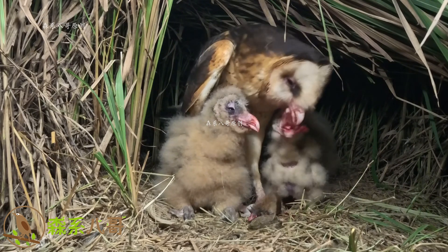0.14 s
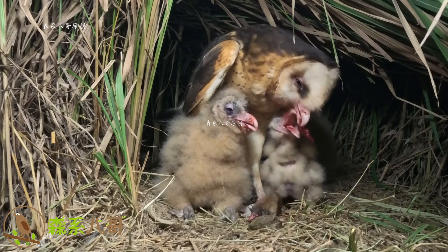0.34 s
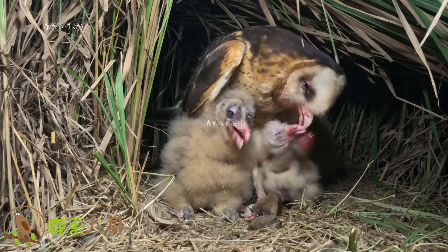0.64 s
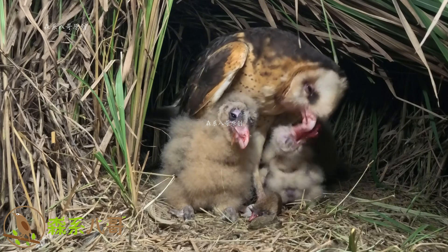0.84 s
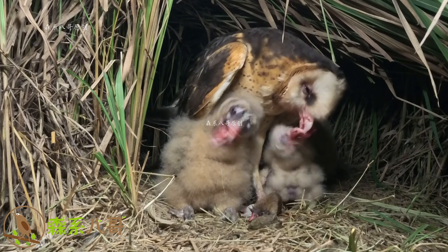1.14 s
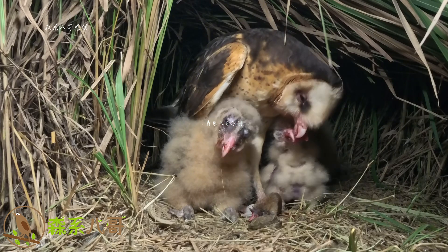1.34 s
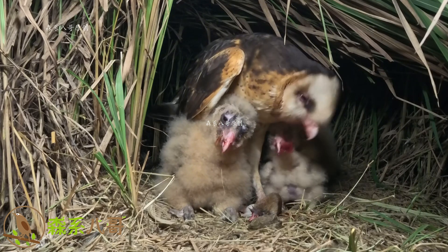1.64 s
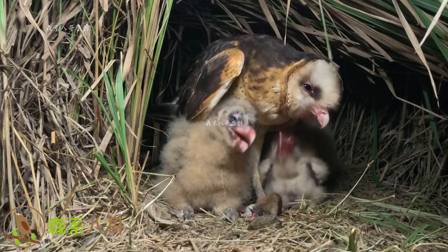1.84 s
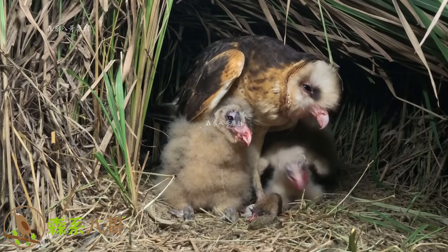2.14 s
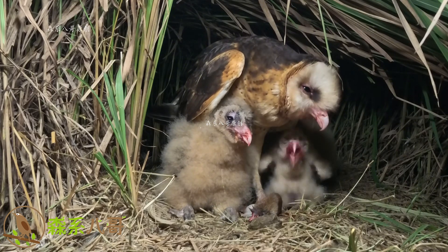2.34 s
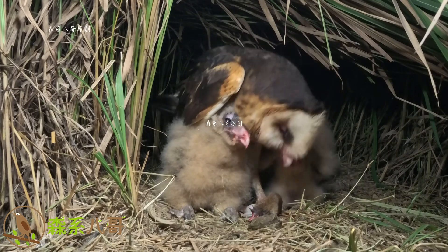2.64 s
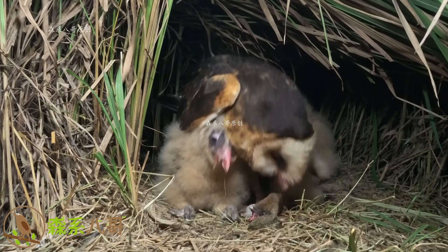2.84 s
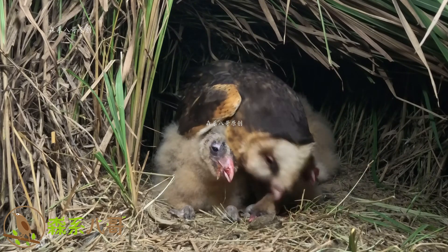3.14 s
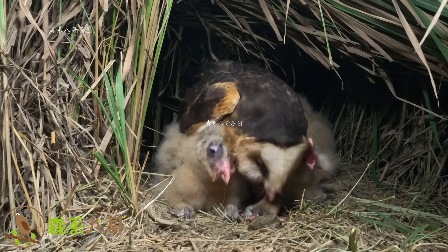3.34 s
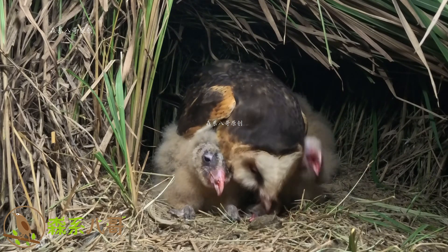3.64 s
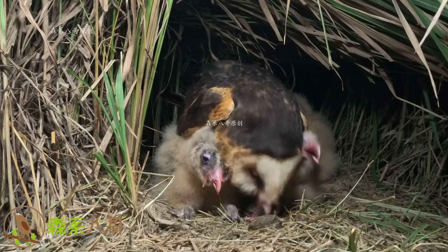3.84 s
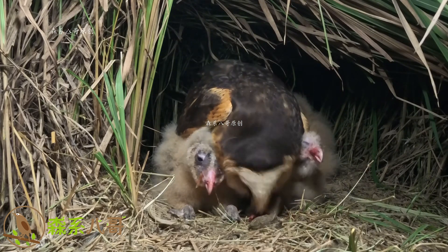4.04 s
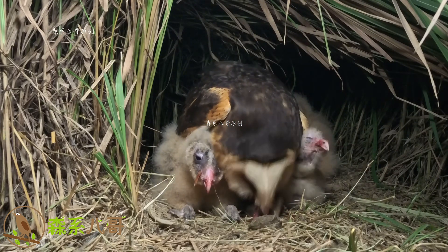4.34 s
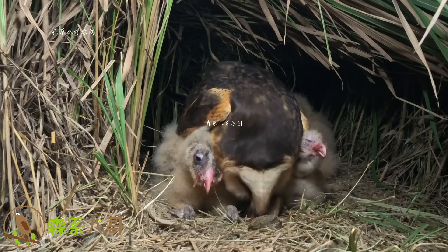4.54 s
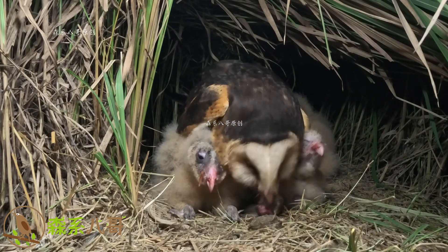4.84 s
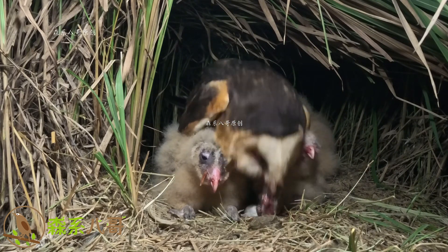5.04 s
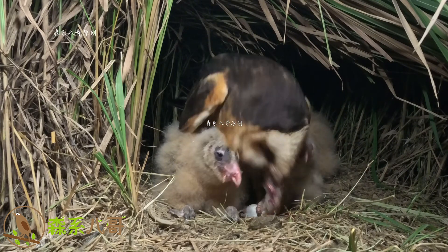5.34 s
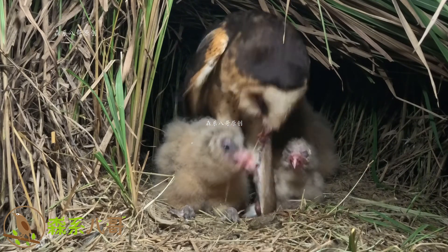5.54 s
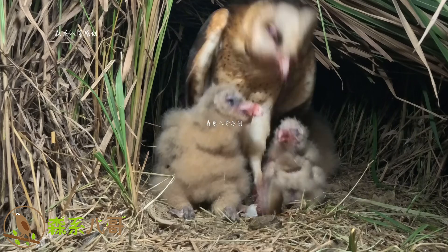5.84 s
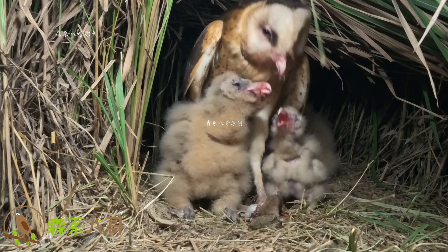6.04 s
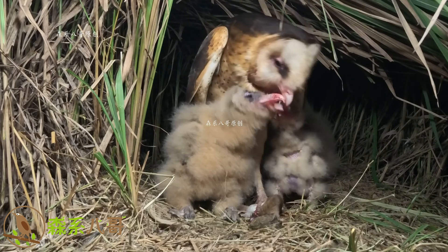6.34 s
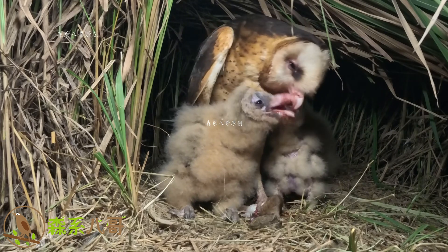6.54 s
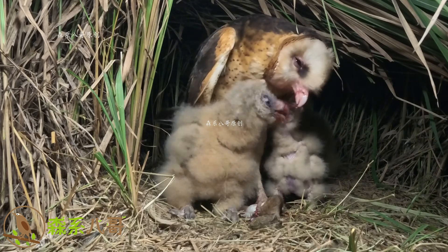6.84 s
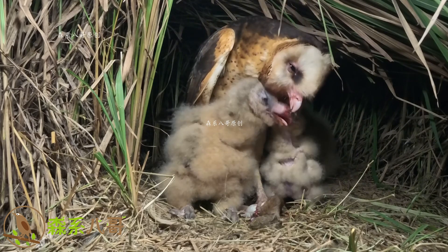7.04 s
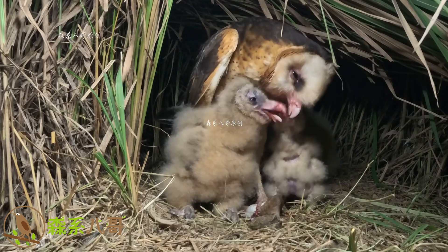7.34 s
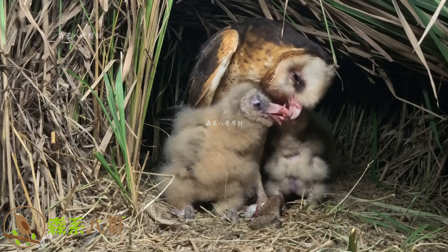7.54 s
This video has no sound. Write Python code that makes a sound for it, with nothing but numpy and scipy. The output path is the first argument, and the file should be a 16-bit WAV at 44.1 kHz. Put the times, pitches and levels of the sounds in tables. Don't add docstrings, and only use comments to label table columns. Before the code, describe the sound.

Young owl chicks give short, harsh hissing begging rasps at close range in a grassy nest, over steadily chirping night crickets.

```python
import sys
import numpy as np
from scipy import signal
from scipy.fft import rfft, irfft, next_fast_len
from scipy.io import wavfile
from scipy.ndimage import uniform_filter1d

SR = 44100
rng = np.random.default_rng(int(sys.argv[2]) if len(sys.argv) > 2 else 0)


def gain_from_db(level_db):
    decades = np.asarray(level_db, float) / 20
    return 10 ** decades


def store_wav(level_fs):
    pcm = np.round(np.clip(np.atleast_2d(level_fs), -1, 1) * 32767)
    wavfile.write(sys.argv[1], SR, pcm.T.astype(np.int16))


N = 338247

# centre in Hz, width in Hz, level in dB.
MOUTH = [(5700, 1080, 1.5), (7400, 1100, 8), (8530, 480, -7)]
BEAK = [(10000, 1440, 6), (12500, 1400, 2), (14300, 1100, -2)]


def evened(x):
    return x / np.sqrt(np.mean(x ** 2) + 1e-20)


def add(mix, s, sound):
    at = round(s * SR)
    sound = sound[max(-at, 0):]
    part = mix[max(at, 0):][:len(sound)]
    part += sound[:len(part)]


def resonate(x, modes):
    size = next_fast_len(len(x))
    f = np.fft.rfftfreq(size, 1 / SR)
    gain = sum(gain_from_db(db) * np.exp(-((f - hz) / width) ** 2) for hz, width, db in modes)
    return evened(irfft(rfft(x, size) * gain, size)[:len(x)])


def drift(hz, size=N):
    knots = rng.standard_normal(N // 32)
    return evened(np.interp(np.arange(size) * hz / SR, np.arange(len(knots)), knots))


def patchwork(shape):
    rough = rng.standard_normal(shape)
    return evened(uniform_filter1d(uniform_filter1d(rough, size=10, axis=0), size=12, axis=1))


def highpass(x, hz):
    return signal.sosfilt(signal.butter(8, hz, "high", fs=SR, output="sos"), x)


def grass(x, t60):
    taps = np.zeros(SR // 2)
    starts = np.arange(300, len(taps) - 20, 20)
    taps[starts + rng.integers(0, 20, len(starts))] = 1
    taps *= rng.choice([-1., 1.], len(taps)) * gain_from_db(-60 * np.arange(len(taps)) / SR / t60)
    return signal.fftconvolve(x, taps / np.linalg.norm(taps))[:N]


def bed(shape, db, patchy_db, flicker_db):
    frames, hz = N // 256 + 5, np.fft.rfftfreq(1024, 1 / SR)
    a, b = rng.standard_normal((2, 513, frames))
    f, level = np.transpose(shape)
    level_db = np.interp(np.log(hz + 1), np.log(f), level, left=-99, right=-99)[:, None]
    uneven_db = patchy_db * patchwork((513, frames)) + flicker_db * rng.standard_normal(frames)
    z = (a + 1j * b) * gain_from_db(level_db + uneven_db)
    return gain_from_db(db) * evened(signal.istft(z, nperseg=1024, noverlap=768)[1][:N])


def wind():
    # frequency in Hz, density in dB per Hz.
    spectrum = [(12, -29), (24, 7), (58, 0), (84, -18), (122, -8), (330, -39), (439, -33.5), (601, -41),
                (791, -40), (2200, -58.5), (2860, -112), (4840, -120)]
    return bed(spectrum, db=-51, patchy_db=1.28, flicker_db=.95)


def far_insects():
    # frequency in Hz, density in dB per Hz.
    spectrum = [(1710, -90), (2900, -29), (3370, -34), (4160, -28), (4470, -17), (5030, -8), (5250, -24),
                (6820, -56), (11600, -120)]
    return bed(spectrum, db=-78, patchy_db=8, flicker_db=.5)


def katydids():
    # frequency in Hz, density in dB per Hz.
    spectrum = [(3820, -50), (6500, -44), (7040, -21), (7610, -7.5), (8210, -3), (8680, 4), (9160, 0.5),
                (9580, -44), (10000, 3.5), (10600, 5.5), (11900, 3), (12800, 1), (13400, -22),
                (14500, -1.5), (15600, -16)]
    return bed(spectrum, db=-58, patchy_db=2.4, flicker_db=3.9)


def chorus():
    out = np.zeros(N)
    for hz, width, db in [(4690, 59, -82), (5060, 45, -80), (5470, 90, -82),
                          (5720, 97, -61), (5900, 70, -61.5), (6050, 94, -61)]:
        out += gain_from_db(db + 3.1 * drift(7)) * resonate(rng.standard_normal(N), [(hz, width, 0)])
    trill = resonate(rng.standard_normal(N), [(2557, 110, 5.5), (2640, 480, -29)])
    return out + gain_from_db(-62 + 2.1 * drift(32)) * trill


def wing_strokes():
    # start in seconds, pace, pitch in Hz, level in dB,
    # haste of the second stroke in seconds.
    high_phrases = [
        (.687, .995, 6120, -38, .012),
        (2.058, 1.022, 6125, -38.5, 0),
        (3.991, .998, 6140, -40, 0),
        (6.096, .99, 6135, -39.5, 0),
    ]
    phrase_s = [0, .288, .496, .572, .648]
    # first stroke in seconds,
    # last stroke in seconds, pitch in Hz, level in dB, late drop in Hz.
    near_chirps = [(0, 0, 5900, -41, 20), (1.612, 1.612, 5890, -34.5, 200), (1.933, 2.006, 5945, -31, 150),
                   (2.082, 2.082, 5960, -32, 120), (4.595, 4.595, 5920, -34, 140),
                   (4.906, 4.906, 5930, -37.5, 300), (4.976, 5.047, 5950, -31.5, 120),
                   (5.265, 5.415, 5885, -29.5, 40), (6.362, 6.362, 5850, -37, 260),
                   (6.692, 6.844, 5895, -29, 40), (7.618, 7.618, 5860, -38, 30)]
    low_chirps = [(-.012, -.012, 5680, -47, 250), (.037, .037, 5720, -46, 250),
                  (.538, .538, 5770, -44, 350), (2.074, 2.074, 5740, -41, -150),
                  (2.626, 2.626, 5780, -46, 200), (2.664, 2.664, 5850, -41, 300),
                  (.278, .494, 5825, -38.5, 30), (.61, .61, 5870, -51, 100), (.798, .941, 5840, -43.5, 280),
                  (1.1, 1.1, 5770, -50, 200), (1.247, 1.247, 5800, -45.5, 200),
                  (1.429, 1.429, 5840, -49, 50), (1.46, 1.46, 5800, -46, 250),
                  (1.716, 1.716, 5800, -38.5, 30), (2.22, 2.22, 5750, -48, 200),
                  (2.506, 2.58, 5850, -40.5, 250), (2.953, 3.09, 5830, -44.5, 200),
                  (3.317, 3.317, 5720, -48, 100), (3.581, 3.721, 5850, -43.5, 330),
                  (3.791, 3.791, 5770, -48, 300), (4.123, 4.27, 5790, -42.5, 170),
                  (4.332, 4.462, 5820, -44, 175), (4.834, 4.834, 5820, -41.5, 90),
                  (5.931, 5.931, 5765, -49.5, 105), (6.064, 6.064, 5770, -41.5, 220),
                  (6.213, 6.291, 5840, -43.5, 100), (6.436, 6.436, 5750, -42, 100),
                  (6.452, 6.6, 5860, -46.5, 280), (7.3, 7.365, 5740, -46, 100),
                  (7.44, 7.52, 5850, -45.5, 100)]
    middle_chirps = [(.05, .05, 6020, -45.5, 50), (.095, .17, 6130, -54, 10), (.6, .6, 5950, -50, 50),
                     (2.56, 2.56, 6020, -44, 30), (4.93, 4.93, 5760, -42, 200), (5.15, 5.21, 6190, -56, 10),
                     (.875, .875, 5960, -45, 100), (1.31, 1.31, 5920, -50, 30),
                     (1.549, 1.549, 5920, -42, 30), (1.666, 1.791, 5980, -44.5, 30),
                     (2.207, 2.357, 5915, -45.5, 100), (2.417, 2.482, 6050, -47, 50),
                     (2.892, 2.892, 5980, -49.5, 90), (2.98, 3.118, 5980, -46, 130),
                     (3.47, 3.47, 6010, -44.5, 60), (3.548, 3.625, 6050, -45.5, 110),
                     (3.02, 3.16, 6110, -54, 60), (5.51, 5.65, 6120, -54, 20), (6.11, 6.11, 6050, -43, 30),
                     (6.24, 6.31, 6020, -49, 60), (6.42, 6.42, 5990, -47, 60),
                     (4.711, 4.711, 5870, -47, 30), (5.179, 5.179, 5980, -53.5, 95),
                     (5.48, 5.61, 6000, -48, 105), (5.67, 5.725, 5905, -48, 100),
                     (5.976, 6.03, 6020, -47, 100), (6.158, 6.158, 6050, -45, 200),
                     (7.049, 7.196, 6040, -45.5, 125), (7.323, 7.323, 6040, -43.5, 60)]
    far_chirps = [(.091, .17, 5410, -63, 30), (2.78, 2.92, 5350, -71, 30), (3.071, 3.071, 5400, -57, 30),
                  (4.4, 4.54, 5330, -76, 30), (4.68, 4.751, 5400, -62, 30)]
    # stroke length in seconds, attack share, release share, wobble in dB, edge scrape in dB.
    high_wing = (.056, .03, .14, 2.3, -33)
    near_wing = (.053, .05, .24, .9, -25)
    hidden_wing = (.056, .06, .2, 2.6, -45)
    gap_s, swell_db = .072, .6
    strokes = []
    for s, pace, hz, db, haste in high_phrases:
        for at in phrase_s:
            strokes.append((s + pace * at - haste * (at == phrase_s[1]), hz, db, 110, high_wing))
    for rows, wing in [(near_chirps, near_wing), (low_chirps + middle_chirps + far_chirps, hidden_wing)]:
        for first, last, hz, db, drop_hz in rows:
            times = np.linspace(first, last, round((last - first) / gap_s) + 1)
            strokes += [(s, hz, db + swell_db * (s - times.mean()) / gap_s, drop_hz, wing) for s in times]
    return strokes


def crickets():
    scattered, scrapes, song = np.zeros((3, N))
    wobble = drift(70)
    for s, hz, db, drop_hz, (length, attack, release, wobble_db, scrape_db) in wing_strokes():
        u = np.linspace(0, 1, round(length * SR))
        rise_hz = np.clip(.9 * (hz - 5960), 0, 210)
        sag_hz = 1.4 * (drop_hz + 50) * u ** 5.1
        pitch_hz = hz + rise_hz * (np.clip((u - .12) / .3, 0, 1) - .52) - sag_hz
        turn = 2 * np.pi * (np.cumsum(pitch_hz) / SR + rng.random())
        dip_db = -.005 * sag_hz - .075 * rise_hz * np.exp(-((u - .6) / .13) ** 2)
        shape = np.minimum(u / attack, 1) * np.clip((1 - u) / release, 0, 1) * gain_from_db(dip_db)
        stroke = np.sqrt(2) * shape * (np.sin(turn) + .028 * np.sin(2 * turn))
        wobbling = np.resize(wobble[max(round(s * SR), 0):], len(u))
        add(song, s, gain_from_db(db + wobble_db * wobbling) * stroke)
        add(scattered, s, gain_from_db(.5 * db - 26) * stroke)
        catch, let_go = np.exp(-((u - .05) / .035) ** 2), np.exp(-((u - .88) / .07) ** 2)
        add(scrapes, s, gain_from_db(db + scrape_db) * (catch + .3 * np.exp(-u / .4) + .5 * let_go))
    scrapes *= resonate(rng.standard_normal(N), [(6800, 420, 0), (5050, 200, -4)])
    return highpass(song + grass(scattered, .42), 5100) + scrapes


def ticks():
    # time in seconds,
    # peak in dB, centre in Hz.
    dry_ticks = [(.0303, -42, 10400), (.2384, -27, 6200), (.243, -30, 4200), (.8011, -40, 8500),
                 (1.2344, -50, 11700), (2.095, -42, 14000), (2.166, -35.5, 10400), (2.204, -44, 9500),
                 (2.4009, -40, 10400), (2.44, -46, 7000), (2.6666, -38.5, 10400), (2.802, -40, 10500),
                 (3.7329, -42, 10200), (4.5415, -36, 10400), (4.5745, -39, 10400), (5.6151, -36, 11000),
                 (6.0057, -42, 11900), (7.1362, -42, 10500), (.4997, -41, 9500), (.5047, -40, 9500),
                 (1.1987, -45, 9500), (5.069, -42, 9500), (7.5842, -35, 6500), (7.6011, -34, 6600),
                 (7.64, -41, 10400)]
    gulps = [(5.582, -42, 2300), (5.62, -49, 2800), (5.626, -51, 2200), (5.633, -51, 3000),
             (5.639, -53, 2400), (5.645, -54, 3000), (5.588, -42, 10500), (5.535, -45, 8500)]
    out, t = np.zeros(N), np.arange(600) / SR
    for s, db, hz in dry_ticks + gulps:
        snap = resonate(rng.standard_normal(600), [(hz, max(.17 * hz, 1200), 0)])
        add(out, s, gain_from_db(db - 6.5) * snap * np.exp(-t / .0035) * np.minimum(t / .001, 1))
    return out


def opening(u, widest, climb_db, climb_power, fall_db, fall_power):
    climb = climb_db * np.clip(1 - u / widest, 0, 1) ** climb_power
    fall = fall_db * np.clip((u - widest) / (1 - widest), 0, 1) ** fall_power
    return -climb - fall


def folds(effort_db, per_s, spread_db, air, stall):
    size = len(effort_db)
    rate = per_s * gain_from_db(.6 * np.clip(effort_db + 4, -20, 0))
    turns = np.cumsum(rate * gain_from_db(4 * drift(600, size))) / SR
    strength = gain_from_db(spread_db * np.clip(rng.standard_normal(size), -3, .8))
    slaps = (np.diff(np.floor(turns), prepend=0) > 0) * strength
    slaps[3:] -= .5 * slaps[:-3].copy()
    flow = np.clip(1.6 * (drift(560, size) + stall), .22, 1)
    return flow * (evened(slaps / np.sqrt(rate)) + air * rng.standard_normal(size))


def slide(x, modes, scale):
    f, t, z = signal.stft(x, SR, nperseg=512, noverlap=384)
    f = f[:, None]
    at = np.interp(t * SR, np.arange(len(x)), np.clip(scale, .4, 2))
    gain = sum(gain_from_db(db) * np.exp(-((f / at - hz) / width) ** 2) for hz, width, db in modes)
    gain *= gain_from_db(2.5 * patchwork(z.shape))
    gain *= 1 - np.exp(-(f / 250) ** 4)
    return evened(signal.istft(z * gain, SR, nperseg=512, noverlap=384)[1][:len(x)])


def rasp(row, manner, beak_db, slides, chest, throat, stall):
    s, length, mouth_db, chest_db, throat_db = row
    u = np.arange(0, length, 1 / SR) / length
    opened_db = np.array([opening(u, *part) for part in manner])
    drive = folds(opened_db[2], per_s=800, spread_db=4.6, air=.58, stall=stall)
    early, late = (1 - u) ** 3.1, u ** 5.1
    parts = np.array([slide(drive, MOUTH, 1 + .04 * late),
                      slide(drive, chest, 1 + slides[0] * early + slides[1] * late),
                      slide(drive, throat, 1 + slides[2] * early + slides[3] * late),
                      slide(drive, BEAK, 1 - .04 * late)])
    level_db = opened_db + np.c_[[mouth_db, chest_db, throat_db, chest_db + beak_db]]
    return s, signal.windows.tukey(len(u), .09) * (gain_from_db(level_db) * parts).sum(0)


def rasps():
    # centre in Hz, width in Hz, level in dB.
    chest = [(489, 199, 2), (950, 370, -8), (1674, 396, -3)]
    small_chest = [(656, 310, 4.5), (1200, 270, -11), (1900, 920, -1)]
    deep_chest = [(430, 230, 3), (820, 260, -10), (1650, 320, -3)]
    throat = [(2680, 530, -1.5), (3800, 1100, -2.5), (4980, 440, -5.5)]
    small_throat = [(2380, 470, 0.078), (3700, 990, 3.1), (4800, 940, -3)]
    pinched_throat = [(3370, 300, -1.5), (3300, 1200, -15)]
    turned_throat = [(3300, 500, -11), (4600, 600, 0)]
    # start in seconds, length in seconds, mouth, chest and throat levels in dB.
    eased_rasps = [(1.455, .261, -35, -41, -41), (3.127, .238, -36.5, -39.5, -45.5)]
    sudden_rasps = [(3.962, .263, -38, -40, -43.5), (4.785, .271, -38.5, -40.5, -48)]
    small_rasps = [(6.172, .263, -41.5, -43.5, -42.5), (7.225, .262, -46.5, -45, -46)]
    pinched_rasps = [(2.24, .114, -62, -52, -42)]
    swelling_rasps = [(.94, .245, -34.5, -46, -41)]
    weak_rasps = [(5.255, .24, -47.5, -47.5, -48)]
    turned_rasps = [(6.775, .235, -37.5, -45.5, -50)]
    deep_rasps = [(5.712, .246, -42, -42.5, -48.5)]
    late_rasps = [(.215, .275, -34.5, -39.5, -38)]
    # widest as share of length,
    # climb in dB, climb power, fall in dB, fall power.
    eased = [(.55, 42, 6.1, 35, 4.6), (.8, 37, 4.8, 23, 3.4), (.55, 28, 4.5, 35, 4.4),
             (.55, 30, 6.1, 22, 4.1)]
    sudden = [(.55, 17, 2.5, 29, 4.5), (.75, 11, 2.1, 26, 5.1), (.55, 21, 2.2, 27, 3.6),
              (.55, 15, 2.5, 26, 4.5)]
    small = [(.3, 20, 2.6, 32, 2.4), (.8, 38, 2.1, 22, 3.5), (.45, 19, 9.1, 24, 3.5), (.6, 24, 14, 30, 4.1)]
    shut = [(.4, 16, 3.1, 14, 6.1), (.62, 60, 1.6, 24, 2.4), (.55, 33, 4.1, 30, 4.1),
            (.6, 14, 2.1, 16, 4.1)]
    swelling = [(.8, 30, 2.4, 31, 2.6), (.65, 35, 1.9, 17, 6.1), (.55, 28, 4.9, 30, 3.6),
                (.35, 19, 12, 30, 3.6)]
    weak = [(.75, 16, 2.4, 27, 2.8), (.85, 30, 2.6, 22, 3.1), (.3, 34, 4.1, 22, 2.4),
            (.62, 30, 1.7, 25, 3.1)]
    turned = [(.3, 38, 1.8, 24, 8.1), (.85, 36, 4.6, 20, 2.5), (.33, 38, 1.8, 14, 2.6),
              (.8, 28, 1.9, 28, 1.8)]
    deep = [(.6, 22, 2.5, 29, 4.5), (.7, 9, 2.1, 22, 5.1), (.55, 24, 2.2, 27, 3.6), (.55, 15, 2.5, 26, 4.5)]
    late = [(.78, 40, 5.6, 30, 3.6), (.8, 52, 4.8, 20, 3.4), (.8, 20, 2.6, 22, 3.1), (.7, 36, 7.1, 22, 3.6)]
    beak_over_chest_db = [-2.5, -.1, 4.1, -7.1, 5.3, 4.4, 2.1, 1.5, -2.5]
    slides_by_manner = [(.2, -.15, -.1, -.1), (.05, -.15, .05, -.1), (.3, -.1, .1, -.1),
                        (.3, -.1, .08, -.1), (.3, -.1, .1, -.1), (.3, -.1, -.1, -.1), (.1, -.05, -.2, .3),
                        (-.05, -.12, .1, -.05), (.2, -.1, -.1, -.15)]
    big_flow, small_flow = 1.55, 1.25
    big_chick, small_chick = (chest, throat, big_flow), (small_chest, small_throat, small_flow)
    voices = [(eased_rasps, eased, big_chick), (sudden_rasps, sudden, big_chick),
              (small_rasps, small, small_chick),
              (pinched_rasps, shut, (small_chest, pinched_throat, small_flow)),
              (swelling_rasps, swelling, small_chick), (weak_rasps, weak, small_chick),
              (turned_rasps, turned, (chest, turned_throat, big_flow)),
              (deep_rasps, deep, (deep_chest, throat, big_flow)), (late_rasps, late, big_chick)]
    out = np.zeros(N)
    for (rows, manner, chick), beak_db, slides in zip(voices, beak_over_chest_db, slides_by_manner):
        for row in rows:
            add(out, *rasp(row, manner, beak_db, slides, *chick))
    return out


def catch(voice):
    # start in seconds, length in seconds.
    catches = [(.25, .006), (5.372, .006), (6.197, .006), (6.209, .006), (6.273, .006), (6.835, .005)]
    out = voice.copy()
    for s, length in catches:
        size = round(length * SR)
        out[round(s * SR):][:size] *= 1 - .9 * signal.windows.tukey(size, .5)
    return out


def fry(voice):
    # first in seconds, last in seconds, gap in seconds, peak in dB, throat in Hz.
    runs = [(.4595, .4595, .005, -24, 2500), (.467, .477, .005, -25, 2200),
            (.9965, 1.001, .0045, -30, 2300), (1.1505, 1.167, .0041, -26, 2250),
            (7.449, 7.461, .004, -34, 2300), (1.685, 1.697, .004, -32, 1700),
            (5.926, 5.938, .004, -35, 1600), (4.188, 4.2, .004, -33, 1750), (3.333, 3.345, .004, -33, 1550),
            (6.1795, 6.1835, .004, -34, 3300), (5.027, 5.039, .004, -33, 1700),
            (6.4, 6.408, .004, -29, 2200), (7.263, 7.263, .005, -32, 4000), (5.452, 5.472, .004, -36, 2300)]
    out, click = voice.copy(), np.zeros(400)
    click[200], click[203] = 1, -.6
    for first, last, gap, db, hz in runs:
        span = round((last - first + 1.5 * gap) * SR)
        out[round((first - .5 * gap) * SR):][:span] *= 1 - .62 * signal.windows.tukey(span, .3)
        head = [(f, width, level - 8) for f, width, level in MOUTH + BEAK]
        slap = resonate(click, [(hz, 380, 15), (550, 300, 6), (4300, 900, -4)] + head)
        for k, s in enumerate(np.arange(first, last + .5 * gap, gap)):
            add(out, s - 200 / SR, gain_from_db(db - 1.5 * k) * slap / abs(slap).max())
    return out


def squeak(voice):
    # start in seconds, first pitch in Hz, last pitch in Hz, level in dB.
    squeaks = [(0.257, 3800, 4040, -43.5), (.4795, 1850, 1200, -45), (.942, 4050, 3950, -61),
               (.968, 3950, 3500, -50), (7.236, 3000, 3600, -54), (6.206, 4200, 3600, -46),
               (3.126, 1950, 2200, -57), (1.166, 2150, 1160, -45), (1.698, 1470, 1010, -47),
               (3.345, 1400, 950, -45.5), (4.2, 1610, 1025, -43.5), (5.036, 1700, 1000, -46),
               (5.259, 1900, 2630, -48), (5.477, 1810, 1200, -46.5), (5.938, 1500, 950, -45),
               (6.411, 1860, 1200, -47), (7.266, 3920, 3700, -49), (7.463, 2190, 1370, -42.5)]
    out = voice.copy()
    u = np.linspace(0, 1, round(.017 * SR))
    for s, from_hz, to_hz, db in squeaks:
        glide_hz = from_hz + (to_hz - from_hz) * u ** .8
        turn = 2 * np.pi * np.cumsum(glide_hz * (1 + .012 * drift(700, len(u)))) / SR
        second = .5 if from_hz > 3700 else .2
        tone = np.sin(turn) + second * np.sin(2 * turn) + .08 * np.sin(3 * turn)
        if 3900 < from_hz < 3940:
            out[round(s * SR):][:len(u)] *= 1 - .85 * signal.windows.tukey(len(u), .4)
        fade_db = -12 * u * (from_hz - to_hz > 300)
        add(out, s, gain_from_db(db + 4 + fade_db) * np.sqrt(2) * tone * signal.windows.tukey(len(u), .6))
    return out


def chicks():
    return squeak(fry(catch(rasps())))


def parting_treble(voice):
    # start in seconds, length in seconds, level in dB.
    splits = [(0.938, 0.037, -7), (1.46, 0.038, -20), (3.182, 0.097, -5), (4.023, 0.24, -24),
              (4.814, 0.11, -6), (5.727, 0.22, -4.5), (6.288, 0.091, -9), (6.902, .04, -22),
              (7.226, 0.088, -9), (7.423, .04, -11)]
    parting = np.zeros(N)
    for s, length, db in splits:
        add(parting, s, gain_from_db(db) * np.hanning(round(length * SR)))
    return parting * highpass(grass(voice, .02), 5000)


def buzzer():
    # start in seconds, level in dB.
    buzzes = [(1.7, -76), (1.91, -69), (2.11, -68), (2.32, -68), (2.66, -79), (3.46, -78), (3.72, -78),
              (4.29, -68), (4.49, -68), (4.685, -69), (5.5, -76), (6.67, -78), (7.02, -72), (7.18, -74),
              (7.59, -69)]
    length, throbs_per_s = .07, 45
    out, t = np.zeros(N), np.arange(0, length, 1 / SR)
    throb = np.sin(np.pi * t / length) * (1 - .6 * np.cos(2 * np.pi * throbs_per_s * t))
    for s, db in buzzes:
        add(out, s, gain_from_db(db + 5) * throb)
    return out * resonate(rng.standard_normal(N), [(4580, 190, 0)])


def scene():
    insects = far_insects() + katydids() + chorus() + crickets() + buzzer()
    voice = ticks() + chicks()
    near_echo = gain_from_db(-27.5) * grass(voice, .21)
    far_echo = gain_from_db(-33) * grass(resonate(voice, [(800, 1000, 0)]), .48) * voice.std()
    mid = wind() + insects + voice + near_echo + far_echo
    side = parting_treble(voice)
    return np.array([mid + side, mid - side])


def low_pass(x):
    return signal.sosfilt(signal.butter(12, 15720, fs=SR, output="sos"), x)


def record(dry):
    return low_pass(dry)


dry = scene()
out = record(dry)
store_wav(out)
```